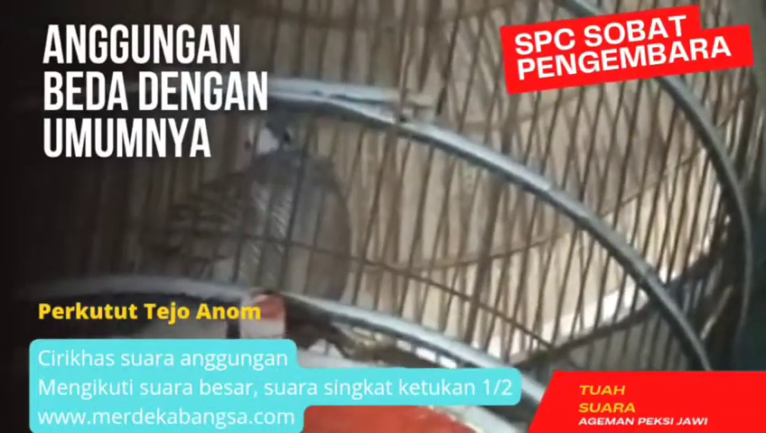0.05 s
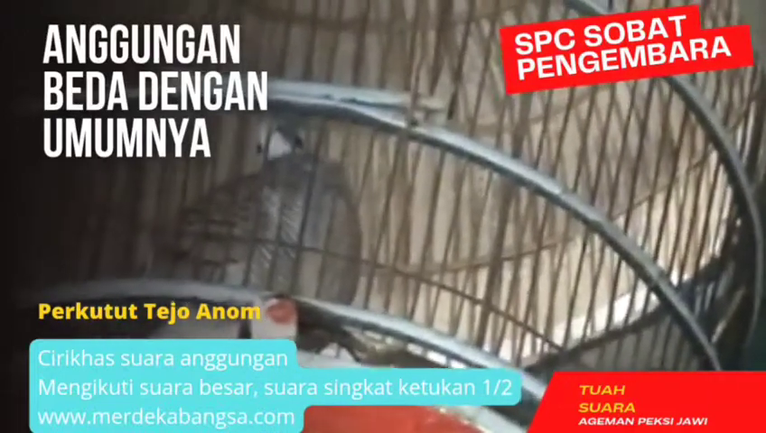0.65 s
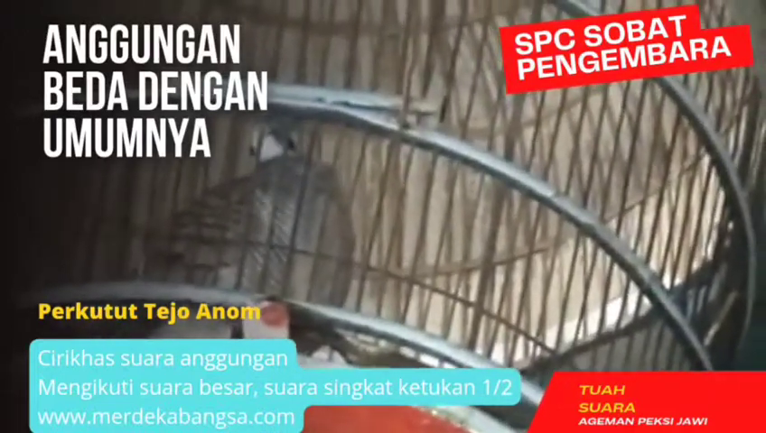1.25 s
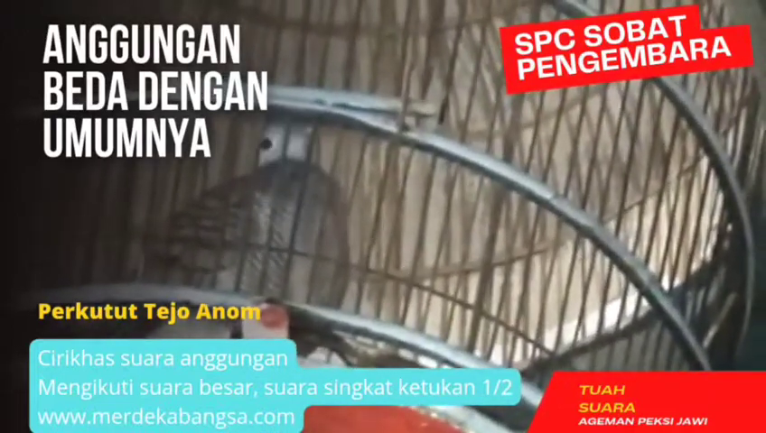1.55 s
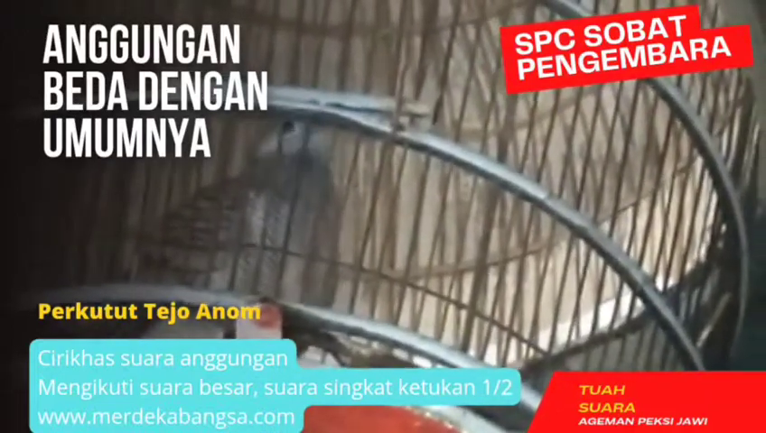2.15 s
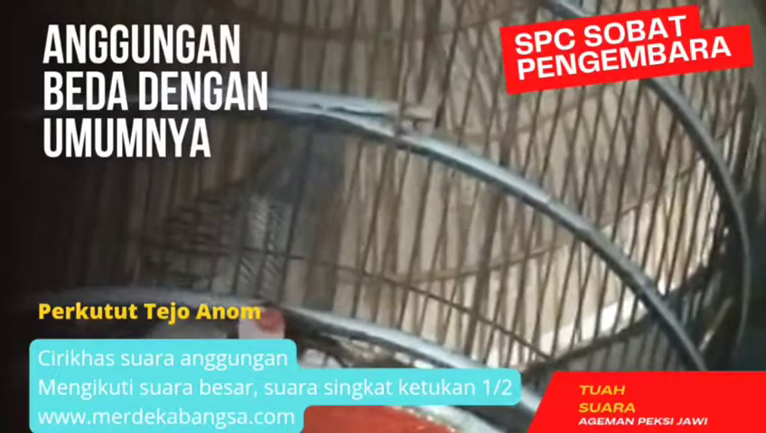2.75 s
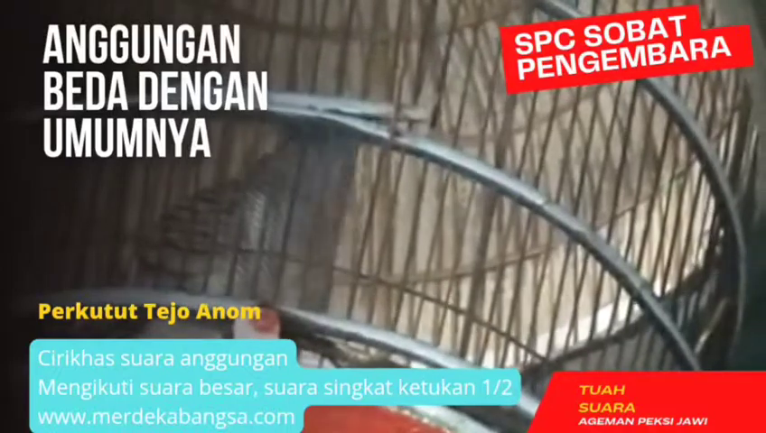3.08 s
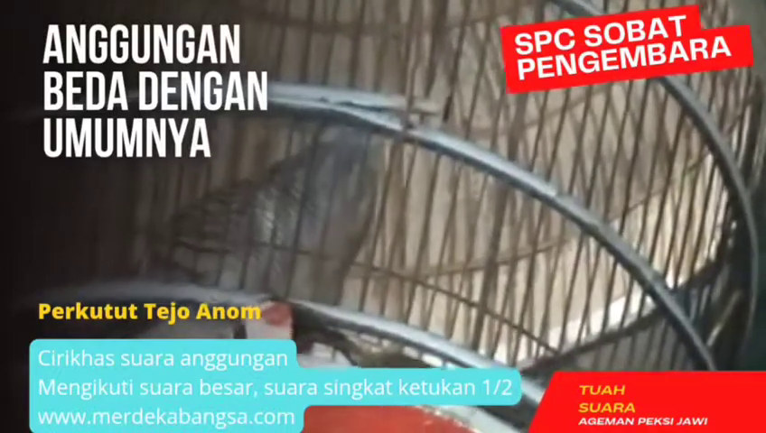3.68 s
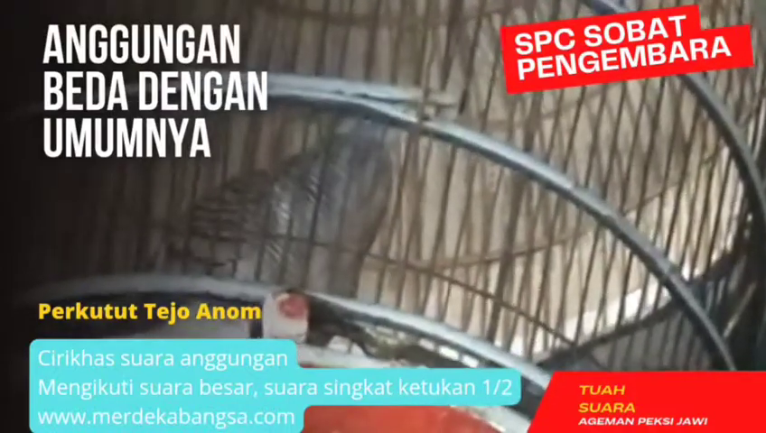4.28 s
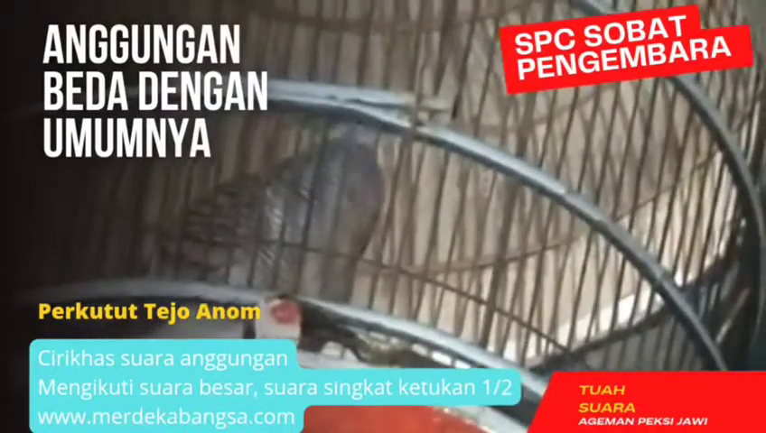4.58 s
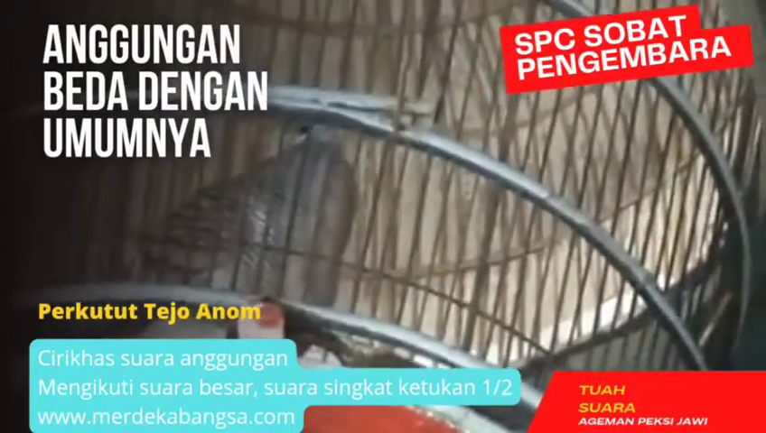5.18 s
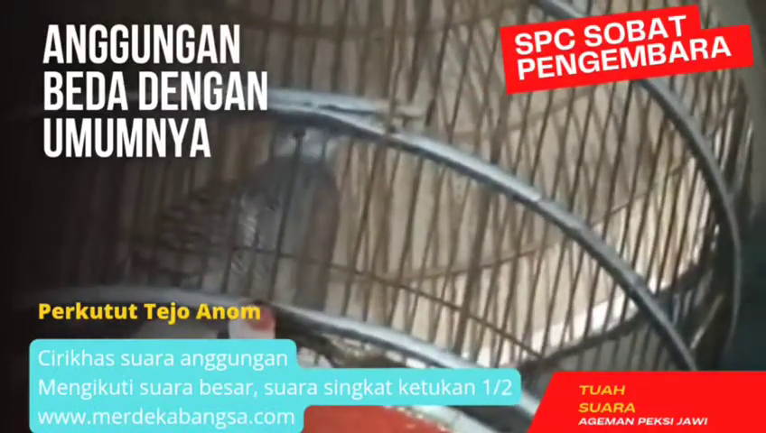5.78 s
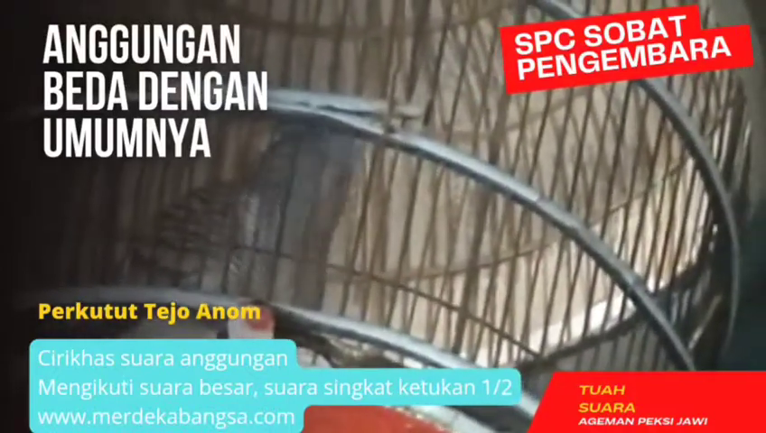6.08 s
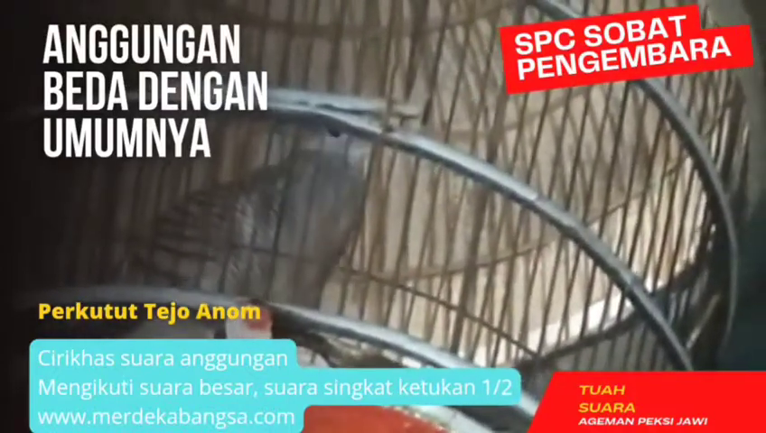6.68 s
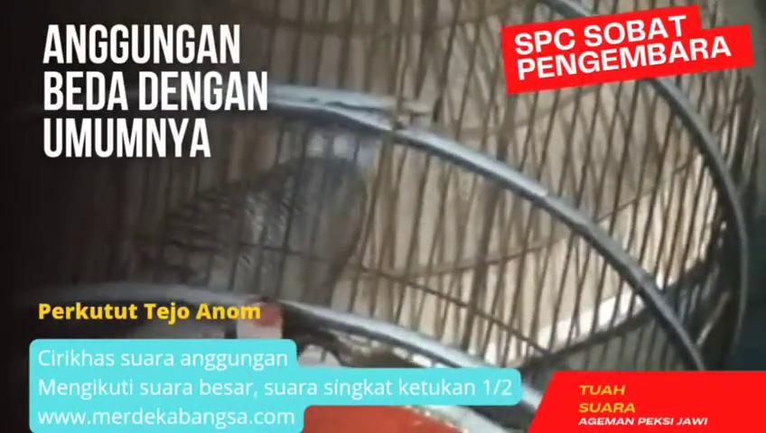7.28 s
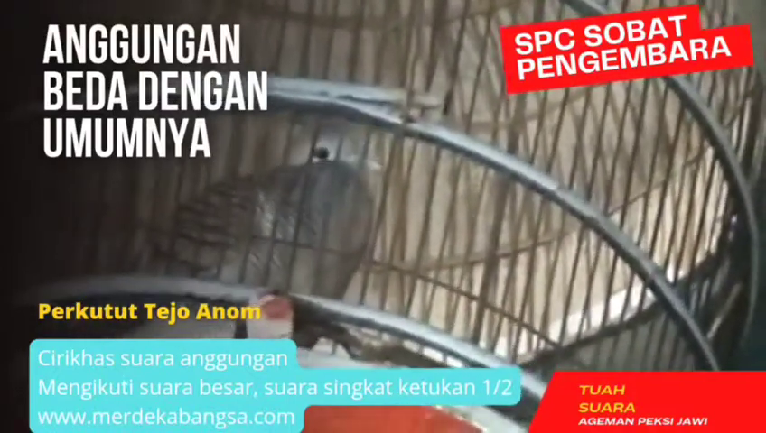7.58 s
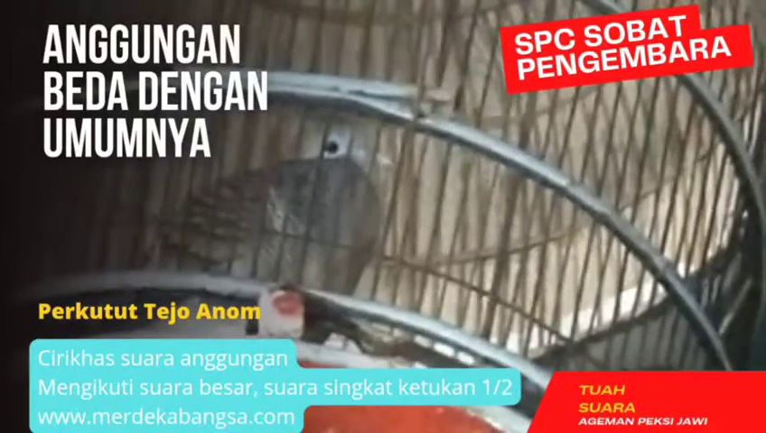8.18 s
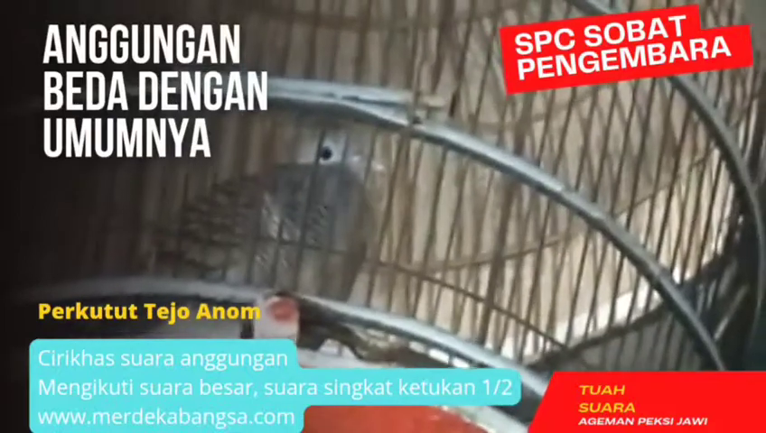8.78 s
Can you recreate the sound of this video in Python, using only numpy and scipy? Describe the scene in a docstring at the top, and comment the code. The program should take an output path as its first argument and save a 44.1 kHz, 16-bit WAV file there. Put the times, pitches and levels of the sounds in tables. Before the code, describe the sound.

Small caged doves trade brief, high, stuttering coos with short pauses, one adding a throaty rattle and dry clucks over a faint rumble.

```python
"""A small dove close to the microphone, caged under a hard, echoing roof, rattles its throat and coos,
its voice membranes flipping between a low and a high register. A second answers, a third calls from
farther off. Around them: ticks of a cage, rustling feathers, faint song birds, swells of insects and
a low room rumble. The recorder's noise suppressor turns it all down between the calls."""
import sys
import numpy as np
from scipy import signal
from scipy.io import wavfile
from scipy.ndimage import uniform_filter1d

SR = 44100
rng = np.random.default_rng(int(sys.argv[2]) if len(sys.argv) > 2 else 0)


def dump(signal):
    """Clip the signal to [-1, 1] and save it as 16-bit WAV at the path in sys.argv[1]."""
    limited = np.clip(np.atleast_2d(signal).T, -1, 1)
    pcm = np.round(limited * 32767).astype(np.int16)
    wavfile.write(sys.argv[1], SR, pcm)


N = 394254

# Syllables, one row a note: delay/s, length/s, start, end and arch as pitch ratios, level/dB, swell/dB
OPENING = [(0, .038, .817, .856, -0.0078, 3, 5.5), (.022, .165, 1, .941, .005, 0.5, 0.5),
           (0.175, .022, .891, .845, -.003, 0, -0.5)]  # a low lead-in flips up to a long sagging coo, then drops back
PIP = [(0, .048, 0.98, 1.04, 0.0024, 0.0037, 3)]  # a short rising note in the low register
FLIP = [(0, 0.032, 1, 1.05, 0.00089, 1, 4), (.02, 0.033, 1.185, 1.12, 0.0056, -4, 1.5)]  # a pip that flips up for a moment
CLOSING = [(0, .041, .85, .884, 0.00088, 4, 2), (0.018, 0.144, 1, 0.96, .003, 0.5, -10.5)]  # a low lead-in flips up to a fading coo
# the nearest dove's phrases: t/s, syllable, stretch factor, f/Hz, level/dB
NEAR_SONG = [(.02, FLIP, 1.01, 867, -26.5), (.146, CLOSING, 0.96, 1010, -33.5),
             (2.234, OPENING, 1, 1083, -31.5), (2.461, PIP, 0.97, 876.3, -29.5),
             (2.544, FLIP, 0.98, 861.5, -28.5), (2.664, CLOSING, 0.99, 1016, -34),
             (4.764, OPENING, 1.013, 1087, -34.5), (4.983, PIP, 1.3, 870, -33.5),
             (5.054, PIP, 1.03, 867.3, -30), (5.168, CLOSING, 1.08, 1013, -35.5),
             (7.326, OPENING, 1.05, 1087, -33), (7.545, FLIP, 1.05, 861, -32),
             (7.631, FLIP, 0.98, 856, -31), (7.744, CLOSING, 0.93, 1011, -34.5)]
# its overtones against the fundamental: f/Hz, level/dB
NEAR_OVERTONES = [(1750, -49), (2100, -40), (2650, -51), (3150, -49.5), (4000, -66), (4900, -73),
                  (5450, -45.5), (5800, -52), (6150, -51.5), (6800, -67.5), (8500, -69.5), (10200, -63.5),
                  (11500, -69)]
# echoes off the walls round its cage: delay/ms, level/dB
NEAR_ECHOES = [(4.01, -0.4), (10.28, 0.9), (15.5, -6), (20.59, -9), (29.71, -8), (35.94, -11),
               (45.75, -13.5), (51.19, -13.5), (59.94, -18.5), (69.13, -9), (84.66, -20.5), (98.66, -11)]
# dry clucks after the rattle and before later phrases: t/s, level/dB
CLUCKS = [(1.72, -36.5), (1.81, -35), (1.887, -35), (1.982, -34), (2.068, -34), (2.192, -35.5),
          (2.222, -34.5), (4.748, -37), (4.76, -44), (7.312, -37.5), (7.322, -38)]


def near_dove():
    """Closest to the microphone: a throat rattle, dry clucks and nearly pure coos, with wall echoes."""
    notes = notes_of(NEAR_SONG)
    voice = sing(notes, NEAR_OVERTONES, edge_s=.012, jitter=.0038, rough=.015)
    voice += throat_clicks(rattle(), rise_s=.0006)
    voice += rasp(onsets(notes, offset_db=-16, lead_s=.0023), fade_s=.0056, low_hz=700.4, high_hz=1135)
    clucks = throat_clicks(stutter(CLUCKS, gap_s=.0033, step_db=10), rise_s=.0004)
    tail = reverb(voice + amp(-8) * clucks, start_s=.06, t60=.56, treble_t60=.18)
    return amp(-.54) * walls(voice + amp(1) * clucks, NEAR_ECHOES) + amp(-4) * tail


def notes_of(song):
    """Spells syllables out as notes: t/s, length/s, start/Hz, end/Hz, arch/Hz, level/dB, swell/dB."""
    return [(s + delay * stretch, length * stretch, hz * start, hz * end, hz * arch, db + note_db, swell)
            for s, syllable, stretch, hz, db in song
            for delay, length, start, end, arch, note_db, swell in syllable]


def sing(notes, overtones=None, *, edge_s, jitter, rough, drift_samples=140):
    """Membranes swing in almost pure, gliding tones; the throat may let a trace of overtones out."""
    out, blur = np.zeros(N), np.hanning(drift_samples)
    blur /= np.linalg.norm(blur)
    for s, length, start_hz, end_hz, arch_hz, db, swell_db in notes:
        u = np.linspace(0, 1, max(round(length * SR), len(blur)))
        # the swing is a little uneven in pitch and in size
        waver = signal.fftconvolve(rng.standard_normal(SR // 2)[:len(u)], blur, "same")
        shake = signal.fftconvolve(rng.standard_normal(SR // 2)[:len(u)], blur, "same")
        hz = start_hz + (end_hz - start_hz) * u + 4 * arch_hz * u * (1 - u)
        phase = 2 * np.pi * np.cumsum(hz * (1 + jitter * waver)) / SR
        tone = np.sin(phase)
        if overtones:
            tone += sum(amp(read(overtones, k * hz)) * np.sin(k * phase) for k in range(2, 12))
        gate = np.sin(np.pi / 2 * np.clip(np.minimum(u, 1 - u) * length / edge_s, 0, 1)) ** 2
        add(out, s, np.sqrt(2) * amp(db + swell_db * (u - .5)) * gate * (1 + rough * shake) * tone)
    return out


# the course of the near dove's rattle: t/s, pulse rate/Hz, level/dB
RATTLE = [(1.271, 87.5, -52), (1.371, 81, -36), (1.429, 89, -39), (1.479, 85, -33), (1.531, 72, -38.5),
          (1.589, 73.7, -36), (1.683, 45.4, -39)]


def rattle(uneven_db=3.0):
    """The throat pulses unevenly in strength at a slowing rate: t/s, level/dB."""
    s, rate, db = np.transpose(RATTLE)
    t = np.arange(s[0], s[-1], 1 / SR)
    count = np.floor(np.cumsum(np.interp(t, s, rate)) / SR)
    pulse_s = t[1:][np.diff(count) > 0]
    pulse_db = np.interp(pulse_s, s, db) + uneven_db * rng.standard_normal(len(pulse_s))
    return list(zip(pulse_s, pulse_db))


# resonances rung by a throat click: f/Hz, level/dB, t60/s
THROAT_MODES = [(886, 1, 0.042), (1080, -1, 0.013), (1176, -5.5, 0.022), (1674, -20.5, 0.012),
                (2790, -24.5, 0.011), (4750, -45, 0.029), (5600, -35.5, 0.0094), (6753, -41, 0.057)]


def throat_clicks(hits, rise_s=.0024):
    """Pops of the voice membranes; the small body radiates no bass."""
    bass_cut = signal.butter(4, 720, "high", fs=SR, output="sos")
    return signal.sosfilt(bass_cut, strike(hits, THROAT_MODES, rise_s))


def stutter(hits, gap_s, step_db):
    """The membranes pop three times, each pop stronger, up to the given hit."""
    return [(s - k * gap_s, db - k * step_db) for s, db in hits for k in range(3)]


def onsets(notes, offset_db, lead_s):
    """Where the membranes start to swing or change register: t/s, level/dB."""
    return [(s - lead_s, db + offset_db) for s, _, _, _, _, db, _ in notes]


def rasp(starts, fade_s, low_hz, high_hz):
    """A short rough burst at each start, while the membranes settle into a clean swing."""
    t, envelope = np.arange(SR // 10) / SR, np.zeros(N)
    for s, db in starts:
        add(envelope, s, amp(db) * t / fade_s * np.exp(1 - 2 * t / fade_s))
    band = signal.butter(3, [low_hz, high_hz], "band", fs=SR, output="sos")
    noise = signal.sosfilt(band, rng.standard_normal(N))
    return envelope * noise / noise.std()


# the second dove's syllables, columns as in OPENING
LONG_COO = [(0, .052, .75, .842, .008, .5, 8.5), (.046, .218, 1, .886, .005, 0.055, -4),
            (.235, .058, .772, .808, 0, 2, 7.5)]  # a longer opening: low, high, low again
ARCH = [(0, .14, 0.98, 1.003, .041, 0.0063, -2)]  # a low note that rises and sinks
# its answers: t/s, syllable, stretch factor, f/Hz, level/dB
SECOND_SONG = [(3.189, LONG_COO, 0.97, 1187, -32), (3.527, PIP, 0.91, 901.6, -31.5),
               (3.655, ARCH, 1.46, 886.6, -34.5), (6.237, LONG_COO, 1.01, 1169, -36),
               (6.598, ARCH, 1.01, 879.4, -36.5), (6.853, ARCH, 0.97, 885.6, -34.5)]
# its overtones against the fundamental: f/Hz, level/dB
SECOND_OVERTONES = [(1800, -45.5), (2300, -36.5), (2800, -50.5), (3500, -53.5), (4600, -54.5),
                    (5600, -60.5), (7000, -53), (9000, -66), (11500, -57.5)]
# echoes off the walls round its cage: delay/ms, level/dB
SECOND_ECHOES = [(5.57, -1.5), (8.71, -8.5), (14.68, -3.5), (22.19, -12.5), (27.04, -10), (33.57, -10),
                 (40.37, -19), (49.0, -11), (66.44, -15), (81.55, -20.5), (93.65, -17)]


def second_dove():
    """From another cage, a cleaner voice answers, its throat clearing just before each syllable."""
    voice = sing(notes_of(SECOND_SONG), SECOND_OVERTONES, edge_s=.0097, jitter=.0012, rough=.0033)
    starts = [(s - .012, db - 9.5) for s, _, _, _, db in SECOND_SONG]
    voice += rasp(starts, fade_s=.01, low_hz=740, high_hz=1270)
    tail = reverb(voice, start_s=.04, t60=.51, treble_t60=.27)
    return amp(-1) * walls(voice, SECOND_ECHOES) + amp(-9) * tail


# the far dove's syllables, columns as in OPENING
HOARSE_COO = [(0, 0.079, .74, .873, .002, 0, -3.5), (0.029, 0.253, 1, .896, 0.024, 0, 8.5)]  # a scoop up into an arched coo
PEEP = [(0, .08, 0.99, .945, 0.0034, 0, -1)]  # a short note that falls a little
# its calls: t/s, syllable, stretch factor, f/Hz, level/dB
FAR_SONG = [(.94, HOARSE_COO, 0.88, 1323, -45), (1.205, PEEP, 0.87, 1155, -43),
            (1.305, PEEP, 0.51, 1236, -38.5), (1.45, PEEP, 1.05, 1302, -42),
            (4.32, HOARSE_COO, .99, 1352, -44.5), (4.56, PIP, 1.4, 1104, -49),
            (4.625, PEEP, 0.84, 1195, -43.5), (4.745, PEEP, 0.92, 1261, -44)]


def far_dove():
    """Farther off, a higher, hoarse voice: as much room as direct sound reaches the microphone."""
    notes = notes_of(FAR_SONG)
    voice = sing(notes, edge_s=.025, jitter=.016, rough=.28, drift_samples=520)
    voice += throat_clicks(stutter(onsets(notes, offset_db=-4, lead_s=-.006), gap_s=.005, step_db=1))
    return amp(-2.5) * (voice + reverb(voice, start_s=.006, t60=.56, treble_t60=.3))


# light knocks on a cage: t/s, level/dB
CAGE_TICKS = [(6.602, -53.5), (6.714, -53.5), (6.835, -53.5), (7.005, -54.5), (7.096, -53.5), (7.224, -51),
              (7.309, -47), (7.515, -56), (7.62, -50), (7.70, -50.5), (7.822, -57), (7.906, -58),
              (8.868, -60.5), (8.926, -61)]
# the cage's resonances: f/Hz, level/dB, t60/s
CAGE_MODES = [(700, 0.5, 0.0029), (1120, -1, 0.056), (1365, 7.5, 0.0044), (1534, 2, 0.011),
              (1824, -21.5, 0.011), (2450, -11.5, 0.01), (3400, -22, 0.012)]


def cage():
    """Bars and perch ring in small ticks, with a short tail from the room."""
    ticks = strike(CAGE_TICKS, CAGE_MODES, rise_s=.00027)
    return amp(5.5) * (ticks + reverb(ticks, start_s=.0037, t60=.3, treble_t60=.2))


# a dove shifts in its cage: t/s, level/dB, fade/s
RUSTLES = [(.02, -72.5, 0.44), (2.175, -62, 0.057), (2.61, -67.5, 0.14), (3.135, -63.5, .03),
           (3.241, -78.5, 0.14), (4.3, -68, 0.031), (5.76, -70, 0.032), (6.114, -65.5, 0.045),
           (6.29, -77, .05), (6.83, -74, .09), (7.81, -67.5, 0.031), (7.855, -65.5, .05),
           (8.13, -67.5, .015), (8.205, -59, 0.082)]
# bright noise of the feathers, also the background hiss: f/Hz, level/dB
HISS = [(1000, -29.5), (3000, -13.5), (6000, -5.5), (9000, -1), (12000, 0.5), (15000, 4.5)]


def feathers(rise_s=.008):
    """Feathers rub in brief bright rustles that rise quickly and die away."""
    t, envelope = np.arange(SR // 2) / SR, np.zeros(N)
    for s, db, fade_s in RUSTLES:
        add(envelope, s, amp(db) * np.minimum(t / rise_s, np.exp((rise_s - t) / fade_s)))
    return envelope * wash(HISS, level_db=0, patchy_db=2.5)


# a steep downward whistle, columns as in OPENING
SLUR = [(0, 0.1, 0.93, .71, .01, 0, 0.019)]
# chirps behind the doves: t/s, syllable, stretch factor, f/Hz, level/dB
BIRD_SONG = [(.35, SLUR, 1.2, 5400, -80), (.46, PEEP, 1.5, 3470, -73.5), (.56, SLUR, .85, 5040, -70),
             (.63, PEEP, 1.4, 2770, -70.5), (1.79, SLUR, 1.16, 5150, -79), (1.99, SLUR, 0.94, 5247, -75),
             (2.77, PEEP, 2.16, 2633, -66), (2.87, SLUR, 0.71, 4600, -79), (4.01, PEEP, 1.5, 4050, -82.5),
             (5.57, PEEP, 0.9, 1635, -68.5), (7.86, PEEP, 0.79, 3900, -76), (8.15, PEEP, 2.23, 2687, -67),
             (8.26, SLUR, 1.5, 4900, -75.5), (8.43, PEEP, 1.1, 2794, -64.5), (8.56, PEEP, 1.36, 2450, -66),
             (8.62, SLUR, 1.53, 5240, -79.5)]


def song_birds():
    """Thin wavering chirps far from the microphone, blurred by distance."""
    voice = sing(notes_of(BIRD_SONG), edge_s=.02, jitter=.02, rough=.25, drift_samples=240)
    return amp(-5) * voice + amp(-3.5) * reverb(voice, start_s=.005, t60=.93, treble_t60=.54)


# the insects' narrow band: f/Hz, level/dB
INSECT_BAND = [(5000, -61), (6300, -30), (7000, -6), (7350, -2), (7750, 0), (8100, -6), (8700, -27),
               (10000, -58)]
# their swells, two or three a second: middle t/s, f/Hz, level/dB
INSECT_SWELLS = [(.1, 7700, -73.5), (.49, 7650, -72.5), (.9, 7600, -72.5), (1.17, 7550, -82),
                 (1.851, 7750, -83), (2.57, 7500, -78), (2.918, 7450, -76.5), (3.349, 7650, -73.5),
                 (3.78, 7650, -79), (4.149, 7700, -79), (4.62, 7700, -79.5), (5.221, 7600, -76),
                 (5.551, 7400, -77.5), (5.9, 7450, -74), (6.279, 7600, -77.5), (6.68, 7700, -78.5),
                 (7.07, 7800, -78), (7.48, 7650, -78), (7.771, 7400, -77.5), (8.149, 7550, -76.5),
                 (8.549, 7700, -79), (8.899, 7750, -74)]


def insects(swell_s=.5, centre_hz=7550):
    """In the background, a faint high buzz swells and fades, each time at a slightly different pitch."""
    t, out = np.arange(N) / SR, np.zeros(N)
    band = signal.hilbert(wash(INSECT_BAND, level_db=0, patchy_db=2))
    for s, hz, db in INSECT_SWELLS:
        on = abs(t - s) < swell_s / 2
        shifted = np.roll(band, rng.integers(N))[on] * np.exp(2j * np.pi * (hz - centre_hz) * t[on])
        out[on] += amp(db) * np.cos(np.pi * (t[on] - s) / swell_s) ** 2 * shifted.real
    return out + amp(-84) * band.real


# room tone under the roof, low rumble and midrange air: f/Hz, level/dB
RUMBLE = [(15, -4), (28, 6), (38, -1), (48, -20), (62, -14), (80, -8), (150, -19), (240, -25), (320, -25.5),
          (450, -30), (900, -38.5), (3000, -70.5)]
AIR = [(100, -31.5), (400, -9), (800, 2), (1600, -2), (2700, -2.5), (4000, -10), (6000, -17), (9000, -27),
       (14000, -40.5)]


def room_tone():
    """Steady rumble, air and hiss all round the microphone."""
    rumble = wash(RUMBLE, level_db=-62, patchy_db=1.95)
    air = wash(AIR, level_db=-74, patchy_db=3.5)
    return rumble + air + wash(HISS, level_db=-77.5, patchy_db=4.5)


def walls(x, echoes):
    """The direct sound reaches the microphone, then its first reflections."""
    out = x.copy()
    for ms, db in echoes:
        add(out, ms / 1000, amp(db) * x)
    return out


def reverb(x, start_s, t60, treble_t60):
    """The diffuse tail under the hard roof; its treble dies sooner."""
    hz, t, spectra = signal.stft(rng.standard_normal(SR), SR, nperseg=256)
    decay_s = read([(1200, t60), (7000, treble_t60)], hz)[:, None]
    tail = signal.istft(spectra * amp(-60 * t / decay_s) / np.sqrt(decay_s), SR, nperseg=256)[1]
    tail *= np.sqrt(np.log(10 ** 6) / SR)  # unit energy
    out = np.zeros(N)
    add(out, start_s, signal.fftconvolve(x, tail))
    return out


def strike(hits, modes, rise_s):
    """Blows (t/s, level/dB) of a finite rise time ring a set of damped modes."""
    t, out = np.arange(SR // 10) / SR, np.zeros(N)
    ring = sum((-1) ** k * amp(db - 60 * t / t60) * np.sin(2 * np.pi * hz * t)
               for k, (hz, db, t60) in enumerate(modes))
    ring *= 1 - np.exp(-t / rise_s)
    for s, db in hits:
        add(out, s, amp(db) * ring)
    return out


def wash(spectrum, level_db, patchy_db):
    """Steady coloured noise with drifting patches."""
    hz, _, spectra = signal.stft(rng.standard_normal(N), SR, nperseg=2048, noverlap=1536)
    patches = uniform_filter1d(rng.standard_normal(spectra.shape), size=12, axis=0)
    patches = uniform_filter1d(patches, size=7, axis=1)
    spectra *= amp(read(spectrum, hz)[:, None] + patchy_db * patches / patches.std())
    noise = signal.istft(spectra, SR, nperseg=2048, noverlap=1536)[1][:N]
    return noise / noise.std() * amp(level_db)


def amp(db):
    """Decibels to gain."""
    return 10 ** (np.asarray(db) / 20)


def read(points, hz):
    """A curve joined by straight lines on a log-frequency axis."""
    f, value = np.transpose(points)
    return np.interp(np.log(hz + 1), np.log(f + 1), value)


def add(mix, s, sound):
    """Mixes a sound in at time s."""
    part = mix[max(round(s * SR), 0):][:len(sound)]
    part += sound[:len(part)]


def scene():
    """Three doves and their surroundings, heard at one microphone."""
    room = room_tone()
    doves = near_dove() + second_dove() + far_dove()
    return (doves + song_birds() + cage() + feathers() + insects() + room)[None]


def noise_suppressor(x, shut_db=-63.5, open_db=-44.5, depth_db=-8, lag_s=.17, snap_db=11.5, start_db=-30):
    """The recorder turns everything down when the sound above the rumble grows quiet."""
    heard = signal.sosfilt(signal.butter(2, 500, "high", fs=SR, output="sos"), x[0])
    level_db = 10 * np.log10(abs(uniform_filter1d(heard ** 2, size=512)) + 1e-12)
    keep = np.exp(-1 / (lag_s * SR))
    slow_db = start_db + signal.lfilter([1 - keep], [1, -keep], level_db - start_db)
    control_db = np.maximum(slow_db, level_db - snap_db)  # a loud call opens it at once
    return x * amp(np.interp(control_db, [shut_db, open_db], [depth_db, 0]))


def record(dry):
    """The recorder's noise suppressor, then its band limit."""
    low_pass = signal.firwin(511, 15750, window=("kaiser", 9), fs=SR)
    return signal.oaconvolve(noise_suppressor(dry), low_pass[None], "same")


dry = scene()
out = record(dry)
dump(out)
```